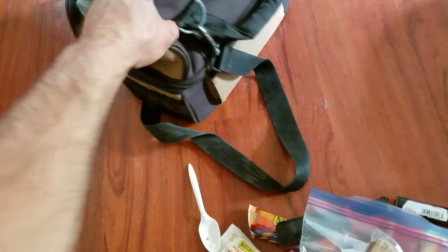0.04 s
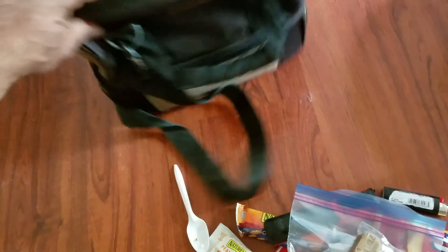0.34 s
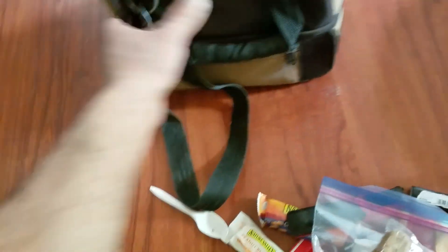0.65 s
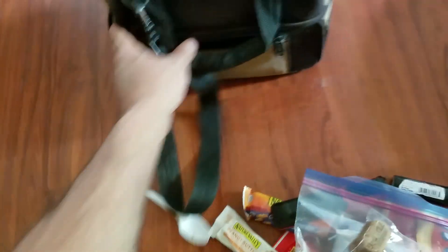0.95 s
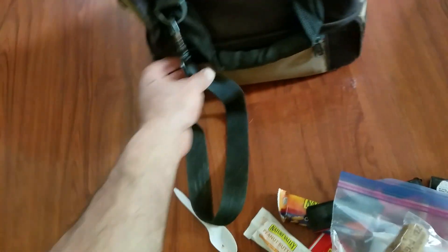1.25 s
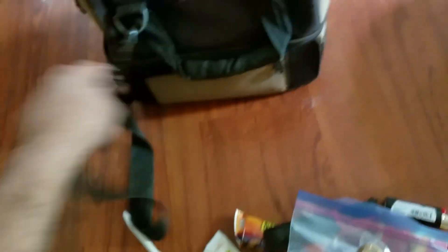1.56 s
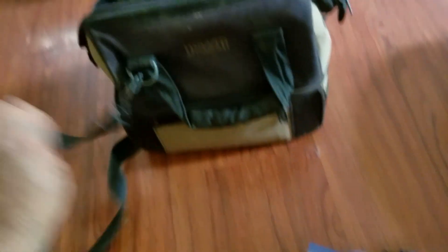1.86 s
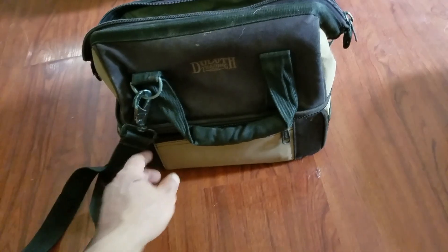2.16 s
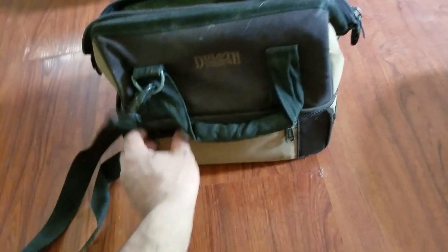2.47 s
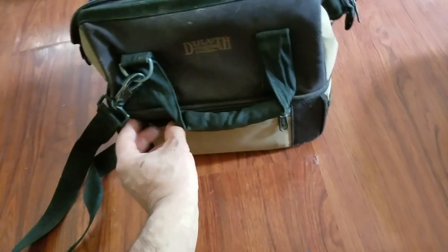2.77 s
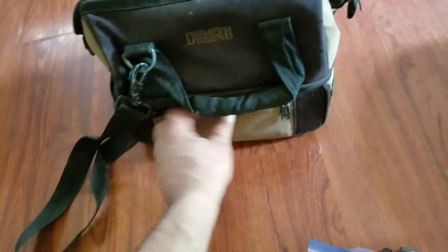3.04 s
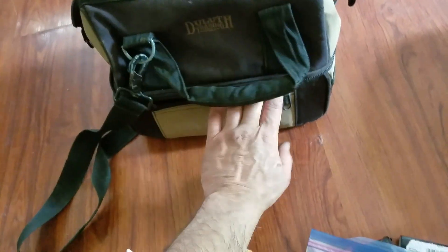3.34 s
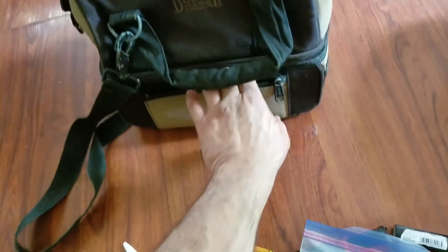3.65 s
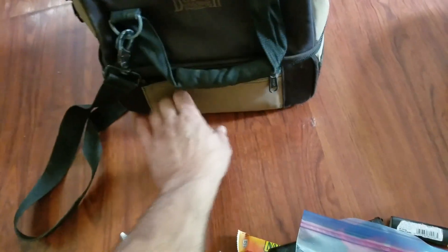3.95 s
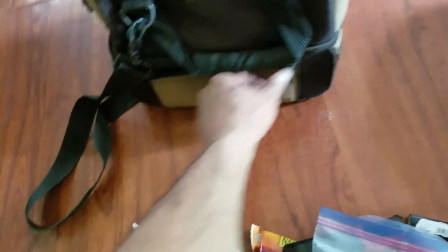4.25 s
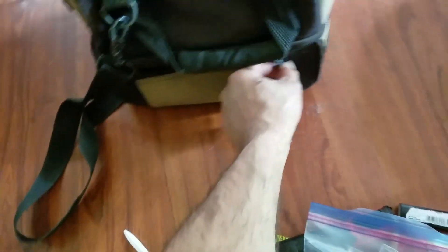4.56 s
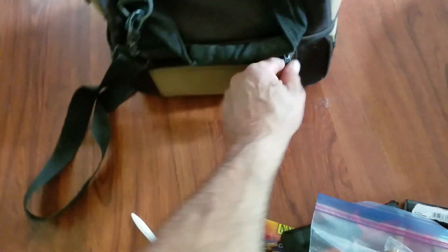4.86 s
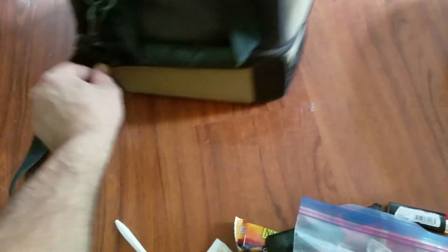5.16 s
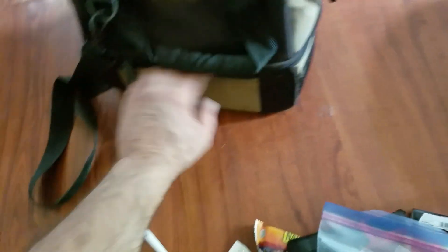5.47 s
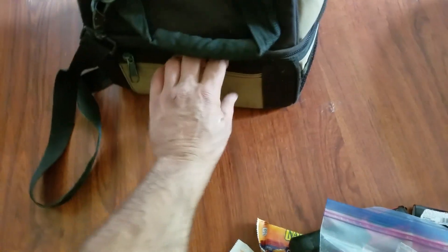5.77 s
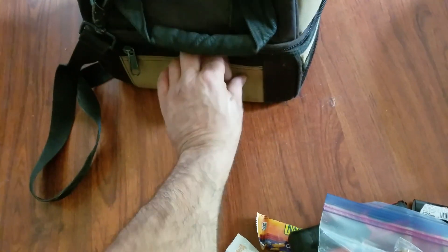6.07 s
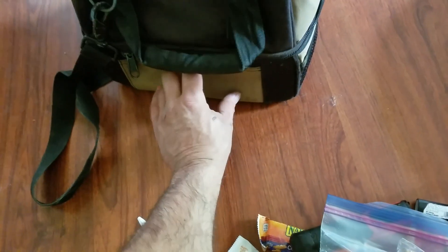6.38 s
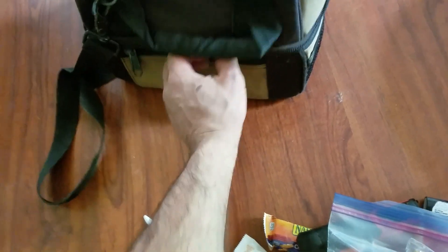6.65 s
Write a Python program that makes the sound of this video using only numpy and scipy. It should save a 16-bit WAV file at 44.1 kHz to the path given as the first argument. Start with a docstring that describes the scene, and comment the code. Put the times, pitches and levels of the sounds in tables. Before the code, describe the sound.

A padded nylon bag rustles and drags on a wooden floor, with small metal clinks and one quick, loud zip.

```python
"""A padded nylon lunch bag is dragged round a wooden floor, close up, and a hand searches its front pocket.
Cloth rasps and hisses in tiny slips, creases snap, and the hollow body thumps. Fingernails pluck ribbed
webbing and the pocket zipper opens in one loud run; both buzz through the stiff panels.
The metal strap clasp and zipper pulls tick and ring. A small, quiet room lies behind."""
import sys
import numpy as np
from scipy import signal
from scipy.fft import rfft, irfft, next_fast_len
from scipy.io import wavfile
from scipy.ndimage import uniform_filter1d, map_coordinates

SR = 44100
rng = np.random.default_rng(int(sys.argv[2]) if len(sys.argv) > 2 else 0)


def put_to_file(sound):
    """Save the sound as 16-bit audio at rate SR, in the file named by the first command-line argument."""
    columns = np.atleast_2d(sound).T  # one column per channel
    safe = np.clip(columns, -1, 1)
    whole_steps = np.round(safe * 32767)
    wavfile.write(sys.argv[1], SR, whole_steps.astype(np.int16))


N = 300321

# Hand effort on the bag. Each row: time in seconds, rubbing level in dB.
EFFORT_DB = [(0.0, -51.5), (0.1, -53), (0.47, -53), (0.63, -53), (1.12, -51.5), (1.26, -65), (1.42, -55),
             (1.6, -57), (1.75, -60.5), (1.96, -54), (2.15, -70.5), (2.43, -66), (2.55, -52), (2.8, -65),
             (2.92, -52.5), (3.3, -52.5), (3.39, -57.5), (3.72, -53.5), (4.14, -54), (4.25, -58),
             (4.33, -55.5), (4.48, -58), (4.98, -65.5), (5.18, -39), (5.45, -54.5), (5.62, -66),
             (6.05, -69), (6.16, -45), (6.3, -60), (6.65, -46), (6.81, -57.5)]
# Drags over the floor. Each row: time of top speed, rise and fall in seconds, hiss in dB.
DRAGS = [(0.439, 0.31, .19, -39), (0.995, .055, 0.063, -47), (1.085, 0.088, .11, -47.5),
         (1.435, 0.047, 0.037, -50.5), (1.58, 0.098, 0.16, -54.5)]
# Noise spectra. Each row: frequency in Hz, relative density in dB.
HOLLOW_BODY_DB = [(25, -26.5), (70, -10.5), (150, -5.5), (200, 1.5), (255, -1.5), (320, 4.5), (400, 3.5),
                  (520, -7), (750, -2), (1500, -78.5)]
CLOTH_RASP_DB = [(120, -24.5), (300, -12), (480, 0), (750, 1), (1050, 1), (1300, -0.5), (1850, 3),
                 (2450, -0.5), (3200, -8), (5000, -16.5), (9000, -35), (16000, -96)]
SLIDE_HISS_DB = [(800, -16), (2200, 11.5), (3500, 5), (4800, 4), (6300, 5), (8000, 1.5), (9600, -3),
                 (11500, 0.5), (14000, -0.5), (16000, -8.5)]
SKIN_HISS_DB = [(1500, -3), (3500, 0.5), (5500, 3), (7500, 0), (9500, -2.5), (11500, 1.5), (14000, 3.5),
                (16000, 0)]
ROOM_AIR_DB = [(15, -61), (25, -10.5), (92, -1.5), (153, -1.5), (175, -4), (293, -10), (531, -26.5),
               (754, -16.5), (2220, -14.5), (3430, -24), (3920, -19), (7110, -36), (16000, -16.5)]
# Loud creases. Each row: start in seconds, level in dB, fold pitch in Hz, crisp edge in relative dB.
CREASE_SNAPS = [(0.107, -27.5, 2170, -30), (0.448, -23.5, 2740, -16), (0.672, -33.5, 406, -5),
                (0.804, -34, 594, 1), (0.875, -29, 1010, -6), (1.069, -23, 530, -17),
                (1.1, -28.5, 464, -12), (1.291, -31.5, 680, -17), (1.366, -29, 880, -35),
                (1.414, -30, 2010, -5), (1.467, -30, 515, -15), (1.523, -36.5, 1890, 0.5),
                (1.573, -29, 550, -10), (1.647, -33, 1380, -11), (1.695, -34, 1400, -13),
                (1.789, -31, 1350, -2.5), (1.941, -28, 717, -34), (2.012, -35, 670, -7),
                (2.066, -38.5, 503, -7), (2.566, -30.5, 1370, -2.5), (2.755, -35, 1230, -5),
                (2.922, -33, 1320, -5), (3.071, -22.5, 400, -33), (3.34, -33.5, 770, -23),
                (3.649, -26.5, 1690, -31.5), (3.804, -20, 1490, -20), (3.816, -15, 770, -37),
                (4.322, -27.5, 700, -31), (4.427, -35, 610, -11), (4.511, -35.5, 435, -5.5),
                (4.744, -36, 545, -5), (4.946, -34.5, 360, -6.5), (5.004, -25.5, 2420, -9),
                (5.017, -25, 733, -6.5), (5.344, -28, 1180, -26), (5.402, -31, 902, -20),
                (5.713, -30.5, 1710, -14.5), (5.799, -38.5, 650, -33), (5.922, -37.5, 590, -28),
                (6.122, -25, 590, -9.5)]
# Fingers and strap bump the bag. Each row: start in seconds, level in dB.
BAG_BUMPS = [(0.804, -47), (1.572, -49), (1.942, -43), (3.07, -37), (3.245, -42), (4.946, -49),
             (6.657, -48)]
# Hand pushes. Each row: peak time and length in seconds, level in dB, taut patch pitch in Hz.
PUSHES = [(0.5, 0.11, -45, 450), (0.998, 0.088, -47.5, 1430), (1.345, 0.03, -47, 414),
          (1.582, 0.038, -50, 556), (1.66, 0.066, -52, 1420), (1.963, 0.04, -54, 330),
          (2.027, 0.058, -48.5, 725), (2.516, 0.078, -46.5, 1420), (2.698, 0.11, -52, 527),
          (2.86, .04, -42.5, 2060), (3.003, 0.058, -52, 1010), (3.086, .03, -60, 2430),
          (3.105, .06, -36.5, 514), (3.232, .16, -40.5, 434), (3.464, 0.061, -45.5, 583),
          (3.678, 0.033, -48, 800), (3.911, .13, -38.5, 730), (4.069, .1, -46.5, 725),
          (4.178, 0.057, -41, 685), (4.203, 0.024, -36.5, 770), (5.112, .14, -28.5, 2170),
          (5.264, 0.11, -50, 1020), (5.511, .11, -41.5, 545), (5.718, 0.025, -49.5, 700),
          (6.012, 0.031, -51.5, 2120), (6.06, .03, -50.5, 1310), (6.144, 0.1, -51, 1750),
          (6.233, 0.075, -44.5, 670), (6.421, 0.21, -50.5, 355), (6.568, 0.063, -36.5, 860),
          (6.667, .08, -34, 338.7)]
# Skin brushing nylon. Each row: peak time and length in seconds, hiss in dB.
SKIN_BRUSHES = [(3.897, 0.19, -47.5), (4.075, 0.11, -53.5), (4.197, 0.033, -51), (4.368, 0.29, -52.5),
                (4.557, 0.045, -52.5), (4.686, 0.31, -55), (5.116, 0.14, -40.5), (5.3, 0.48, -50),
                (6.215, 0.2, -52), (6.374, 0.16, -56), (6.584, 0.092, -42.5)]
# Clasp and pull hits. Each row: start in seconds, level in dB, singing mode in Hz, its T60 in seconds.
METAL_HITS = [(0.51, -29.5, 10400, .03), (0.8034, -38, 11330, 0.077), (0.8777, -44, 6220, 0.039),
              (1.3597, -34, 8050, 0.03), (1.4135, -44, 5000, 0.16), (1.6024, -44, 5450, 0.11),
              (1.7909, -31.5, 7900, 0.033), (2.5232, -31.5, 5550, 0.25), (2.5426, -24, 14800, 0.11),
              (2.5657, -46, 11360, 0.29), (2.7562, -35.5, 7700, 0.041), (2.925, -34.5, 14000, 0.033),
              (3.6485, -41, 8500, .03), (3.81, -26, 10400, 0.1), (4.747, -35.5, 8940, 0.022),
              (4.9467, -36, 8930, 0.016), (5.2541, -20.5, 14070, 0.083), (5.2815, -26, 11500, 0.12),
              (5.3442, -27, 14000, .1), (5.373, -38, 4400, 0.08), (5.4013, -31, 10200, 0.12)]
# Modes of the fittings. Each row: frequency in Hz, relative level in dB.
METAL_MODES = [(4400, 7), (5480, -9), (5900, 8), (7490, -2.5), (8414, 7), (10500, -6), (11400, 20),
               (11990, -74), (13990, 10.5), (14300, -11), (14860, -17)]
# Nail or edge on webbing. Each row: start and length in seconds, level in dB, first and final rib rate in Hz.
RIB_SCRAPES = [(0.6, 0.049, -38, 558, 613), (1.075, 0.22, -41.5, 445, 540),
               (1.165, 0.11, -49.5, 316.4, 305), (3.069, 0.074, -29, 380.3, 537.7),
               (6.648, 0.082, -31, 406.4, 341)]
# Panel and cavity resonances. Each row: frequency and width in Hz, gain in dB.
PANEL_MODES = [(376, 73, 5), (770, 410, 0.5), (1018, 35, 3), (1435, 290, -6.5), (1867, 270, 4.5),
               (2410, 83, -3.5)]
# Zipper run. Each row: time in seconds, tooth rate in Hz, gain from slider drag in dB.
ZIPPER_RUN = [(5.03, 276.6, -3.5), (5.06, 305, -2), (5.09, 380.4, -8), (5.108, 693.5, 0.5),
              (5.118, 810.5, -4), (5.127, 741.4, 1), (5.135, 909, -10), (5.148, 1031, -2),
              (5.16, 905, -5.5), (5.169, 726, 2), (5.18, 508, 0), (5.205, 315, -8)]
# Room decay. Each row: frequency in Hz, T60 in seconds.
ROOM_T60_S = [(150, 0.64), (1000, 0.17), (4000, 0.33), (14000, 0.074)]
# Likeness of the two microphone ports. Each row: frequency in Hz, left-right correlation.
PORT_CORRELATION = [(40, 0.23), (150, 0.83), (300, 0.7), (600, 0.87), (1200, 0.53), (2200, 0.41),
                    (4000, -0.06), (8000, 0), (13000, -0.07)]
# Shading by the microphone housing. Each row: frequency in Hz, left minus right in dB.
PORT_SHADE_DB = [(900, 0), (2300, -1.5), (3400, -6), (4600, 0.5), (5600, -6.5), (10000, -8.5), (12500, -1),
                 (15000, 2.5)]

MID_FOLD_HZ = 783


def amp(db):
    return 10 ** (np.asarray(db) / 20)


def unit_rms(x):
    return x / np.sqrt(np.mean(x ** 2) + 1e-20)


def decay(t, t60_s):
    return amp(-60 * t / t60_s)


def at_hz(points, hz):
    """Table lookup on a log frequency axis."""
    knots_hz, values = np.transpose(points)
    return np.interp(np.log(hz + 1), np.log(knots_hz + 1), values)


def curves(rows):
    """Per-sample curve of each column after the time."""
    times_s, *columns = np.transpose(rows)
    return [np.interp(np.arange(N) / SR, times_s, column) for column in columns]


def wobble(rate_hz):
    """Smooth random curve."""
    knots = rng.standard_normal(int(N * rate_hz / SR) + 4)
    return map_coordinates(knots, [np.arange(N) * rate_hz / SR])


def swell(peak_s, rise_s, fall_s, roundness=2.24):
    """Stroke envelope: peak 1, 12 dB down at rise_s before and fall_s after."""
    t = np.arange(N) / SR - peak_s
    near = (t > -3 * rise_s) & (t < 3 * fall_s)
    distance = np.abs(t[near] / np.where(t[near] < 0, rise_s, fall_s))
    gain = np.zeros(N)
    gain[near] = amp(-12 * distance ** roundness)
    return gain


def filtered(x, response):
    """Apply a complex frequency response."""
    size = 2 * next_fast_len(N // 2 + SR // 4)
    return irfft(rfft(x, size) * response(np.fft.rfftfreq(size, 1 / SR)), size)[..., :N]


def coloured(x, spectrum_db):
    """Minimum-phase filter; keeps the power of white noise."""
    def response(hz):
        cepstrum = irfft(np.log(unit_rms(amp(at_hz(spectrum_db, hz)))))
        half = len(cepstrum) // 2
        return np.exp(rfft(np.r_[cepstrum[0], 2 * cepstrum[1:half], np.zeros(half)]))
    return filtered(x, response)


def noise_band(pitch_hz, width_hz, count):
    """Unit-RMS noise in one resonance."""
    radius = np.exp(-np.pi * width_hz / SR)
    poles = [1, -2 * radius * np.cos(2 * np.pi * pitch_hz / SR), radius ** 2]
    once = signal.lfilter([1, 0, -1], poles, rng.standard_normal(count))
    return unit_rms(signal.lfilter([1, 0, -1], poles, once))


def add(track, start_s, sound):
    start = max(round(start_s * SR), 0)
    part = track[..., start:start + sound.shape[-1]]
    part += sound[..., :part.shape[-1]]


def spread(pair):
    """Two unrelated signals to left and right, alike in the bass."""
    def response(hz):
        angle = np.arccos(np.clip(at_hz(PORT_CORRELATION, hz), -1, 1)) / 2
        return np.array([np.cos(angle), np.sin(angle)])
    mid, side = filtered(pair, response)
    return np.array([mid + side, mid - side])


def friction(slips_per_s, size_db, clump_db, clump_hz):
    """Threads catch and let go: uneven slips, in clumps."""
    slips = rng.random(N) < slips_per_s / SR
    sizes = amp(size_db * np.clip(rng.standard_normal(N), -2, 2))
    clumps = amp(clump_db * wobble(clump_hz))
    return unit_rms(slips * sizes * clumps * rng.standard_normal((2, N)))


def sliding_cloth():
    """Cloth shakes the hollow bag, rasps and hisses with hand effort; drags add rasp and hiss."""
    effort_db, = curves(EFFORT_DB)
    above_usual_db = effort_db + 55
    drag = sum(amp(db) * swell(peak_s, rise_s, fall_s, roundness=1.5)
               for peak_s, rise_s, fall_s, db in DRAGS)
    body_gain = amp(-62 + 0.58 * above_usual_db)
    rasp_gain = np.hypot(amp(effort_db + 0.5), amp(-9.5) * drag)
    hiss_gain = np.hypot(amp(-61.5 + 0.77 * above_usual_db), drag)
    body = body_gain * friction(slips_per_s=2500, size_db=2, clump_db=2.5, clump_hz=60)
    rasp = rasp_gain * friction(slips_per_s=2400, size_db=3.6, clump_db=3, clump_hz=70)
    hiss = hiss_gain * friction(slips_per_s=14000, size_db=2.5, clump_db=1.63, clump_hz=42)
    return coloured(body, HOLLOW_BODY_DB) + coloured(rasp, CLOTH_RASP_DB) + coloured(hiss, SLIDE_HISS_DB)


def crinkles(per_s=9, above_effort_db=10.5, scatter_db=2.5, scatter_octaves=0.83, crisp_db=-32):
    """Small creases give at random, louder with effort. Rows as in CREASE_SNAPS."""
    draws = rng.random((200, 3))
    starts_s = np.cumsum(0.3 + 1.4 * draws[:, 0]) / per_s
    size, pitch = np.sqrt(3) * (2 * draws[:, 1:].T - 1)  # unit variance
    db = np.interp(starts_s, *np.transpose(EFFORT_DB)) + above_effort_db + scatter_db * size
    fold_hz = MID_FOLD_HZ * 2 ** (scatter_octaves * pitch)
    return [(*row, crisp_db) for row in zip(starts_s, db, fold_hz) if row[0] < N / SR]


def snaps_and_bumps(attack_s=0.00076, mid_snap_db=-28.5):
    """A crease cracks and crumples, its fold rings and the bag thumps. A bump only thumps."""
    t = np.arange(SR // 6) / SR
    cloth, thump, crisp = np.zeros((3, 2, N))
    folds = np.zeros(N)
    onset = 1 - np.exp(-(t / attack_s) ** 4)
    crack = onset * decay(t, t60_s=0.011)
    crumple = onset * amp(-12) * decay(t, t60_s=0.12)
    boom = onset * decay(t, t60_s=0.14)
    ring = onset * decay(t, t60_s=0.019)
    for start_s, db in BAG_BUMPS:
        add(thump, start_s, amp(db) * boom * rng.standard_normal((2, len(t))))
    for start_s, db, fold_hz, crisp_db in list(CREASE_SNAPS) + crinkles():
        noise = rng.standard_normal((3, 2, len(t)))
        # big, low folds shake the bag more
        thump_db = -52 + 0.19 * (db - mid_snap_db) - 2.5 * np.log2(fold_hz / MID_FOLD_HZ)
        add(cloth, start_s, amp(db - 5) * (crack + crumple) * noise[0])
        add(thump, start_s, amp(thump_db) * boom * noise[1])
        add(crisp, start_s, amp(db + crisp_db) * (crack + crumple) * noise[2])
        drift_rad = np.cumsum(0.073 * rng.standard_normal(len(t)))  # a slack fold holds no pitch
        add(folds, start_s, amp(db - 1) * ring * np.sin(2 * np.pi * fold_hz * t + drift_rad))
    cracks = coloured(cloth, CLOTH_RASP_DB) + coloured(crisp, SLIDE_HISS_DB)
    return spread(cracks + coloured(thump, HOLLOW_BODY_DB)) + folds


def scuffs(rise_share=0.53, mid_patch_hz=700):
    """A push rasps the cloth, rings a taut patch and hisses under the skin. A brush only hisses."""
    pushes, patches = np.zeros((2, N))
    for peak_s, length_s, db, patch_hz in PUSHES:
        push = amp(db) * swell(peak_s, rise_share * length_s, (1 - rise_share) * length_s)
        pushes += push
        taut = noise_band(patch_hz, width_hz=60 + 0.22 * patch_hz, count=SR)
        active = np.flatnonzero(push)
        patch_db = -5 - np.log2(patch_hz / mid_patch_hz)  # larger, lower patches resonate more
        patches[active] += amp(patch_db) * push[active] * taut[:len(active)]
    brushes = sum(amp(db) * swell(peak_s, length_s / 2, length_s / 2)
                  for peak_s, length_s, db in SKIN_BRUSHES)
    slips = pushes * friction(slips_per_s=6000, size_db=2.5, clump_db=1.8, clump_hz=130)
    cloth = amp(-2) * coloured(slips, CLOTH_RASP_DB) + amp(-13.5) * coloured(slips, HOLLOW_BODY_DB)
    skin_gain = np.hypot(amp(-14.5) * pushes, brushes)
    skin = skin_gain * friction(slips_per_s=22000, size_db=-1, clump_db=3, clump_hz=450)
    return spread(cloth + coloured(skin, SKIN_HISS_DB)) + patches


def clinks(attack_s=0.00049):
    """Metal on metal: a tick, modes that vary with the contact point, one singing until webbing damps it."""
    t = np.arange(SR // 4) / SR
    rings, ticks = np.zeros((2, 2, N))
    modes_hz, modes_db = np.transpose(METAL_MODES)
    onset = 1 - np.exp(-t / attack_s)
    strike = onset * decay(t, t60_s=0.019)
    for start_s, db, sing_hz, t60_s in METAL_HITS:
        hz = np.r_[sing_hz, modes_hz * (1 + 0.025 * rng.standard_normal(len(modes_hz)))]
        gains = amp(np.r_[5, modes_db] + 6.6 * rng.standard_normal((2, len(hz))))
        modes = np.sin(2 * np.pi * (hz[:, None] * t + 0.5 * rng.random((2, len(hz), 1))))
        chord = unit_rms((gains[..., None] * modes).sum(1))
        singing = np.array([noise_band(sing_hz, width_hz=280, count=len(t)) for _ in range(2)])
        tail = onset * decay(t, t60_s)
        add(rings, start_s, (amp(db - 9) * strike + amp(db - 19.5) * tail) * chord)
        add(rings, start_s, amp(db - 10.5) * tail * singing)
        add(ticks, start_s, amp(db - 4.5) * strike * rng.standard_normal((2, len(t))))
    return rings + coloured(ticks, SKIN_HISS_DB)


def panel_response(hz, cutoff_hz=2700):
    """The bag's panels resonate; bending waves bring the lows after the highs."""
    modes = sum(amp(db) * 1j * hz * width_hz / (mode_hz ** 2 - hz ** 2 + 1j * hz * width_hz)
                for mode_hz, width_hz, db in PANEL_MODES)
    dispersion = np.exp(-1j * np.sqrt(hz))
    return modes * dispersion / (1 + (hz / cutoff_hz) ** 8)


def rib_plucks(rib_hz, jitter):
    """One pluck per rib, unevenly paced, rung through the panels at steady level."""
    ribs_passed = np.cumsum(rib_hz * np.exp(jitter * wobble(rate_hz=300))) / SR
    plucks = np.diff(np.floor(ribs_passed), prepend=0) * amp(rng.standard_normal(N))
    rung = filtered(plucks, panel_response)
    power = np.abs(uniform_filter1d(rung ** 2, size=900))
    return rung / np.sqrt(power + 1e-12)


def rib_buzz(rib_hz, pressure, trailing_db, hum_cutoff_hz=800):
    """Two contacts cross ribs or teeth, one trailing. Light pressure hums; hard pressure adds overtones."""
    lead = rib_plucks(rib_hz, jitter=0.028)
    trailing = rib_plucks(rib_hz * 0.69, jitter=0.11)
    buzz = amp(-1.87) * lead + amp(trailing_db) * trailing * np.array([[1], [0.4]])
    hum = amp(3) * filtered(lead, lambda hz: 1 / (1 + (hz / hum_cutoff_hz) ** 6))
    pressure_db = 20 * np.log10(pressure + 1e-9)
    bite = np.clip((pressure_db + 43) / 13, 0, 1)
    return pressure * (bite * buzz + (1 - bite) * hum)


def scrapes(attack_s=0.013, settle_s=0.02, fade_db=21.5):
    """A nail or edge bites into webbing; its speed settles as the pressure fades."""
    t = np.arange(N) / SR
    rib_hz, pressure = np.full(N, float(RIB_SCRAPES[0][3])), np.zeros(N)
    for start_s, length_s, db, first_hz, final_hz in RIB_SCRAPES:
        after = t >= start_s
        age_s = t[after] - start_s
        rib_hz[after] = final_hz + (first_hz - final_hz) * np.exp(-age_s / settle_s)
        drop_db = fade_db * np.minimum(age_s / length_s, 10) ** 1.46
        pressure[after] = np.minimum(age_s / attack_s, 1) * amp(db - drop_db)
    return rib_buzz(rib_hz, pressure, trailing_db=-4)


def zipper(attack_s=0.0045, release_s=0.035, brisk_hz=775, db_per_octave=6):
    """The slider runs over the teeth: pitch and level follow speed, drag adds level."""
    t = np.arange(N) / SR
    teeth_hz, drag_db = curves(ZIPPER_RUN)
    start_s, end_s = ZIPPER_RUN[0][0], ZIPPER_RUN[-1][0]
    moving = np.clip((t - start_s) / attack_s, 0, 1) * np.clip((end_s - t) / release_s, 0, 1)
    level_db = -20.5 + drag_db + db_per_octave * np.log2(teeth_hz / brisk_hz)
    return rib_buzz(teeth_hz, moving * amp(level_db), trailing_db=-10)


def room_reverb(x):
    """Wall reflections, each frequency decaying at its own rate."""
    hz, t, spectra = signal.stft(rng.standard_normal((2, SR // 2)), SR, nperseg=256)
    _, tail = signal.istft(spectra * decay(t, at_hz(ROOM_T60_S, hz)[:, None]), SR, nperseg=256)
    tail /= np.linalg.norm(tail[0])
    tail = np.pad(tail, ((0, 0), (SR // 200, 0)))  # 5 ms predelay
    return signal.fftconvolve(x, tail, axes=1)[:, :N]


def scene():
    """Close bag, room reverb and still air."""
    air = amp(-62.5) * coloured(rng.standard_normal((2, N)), ROOM_AIR_DB)
    bag = spread(sliding_cloth()) + scuffs() + zipper() + scrapes() + clinks() + snaps_and_bumps()
    direct = filtered(bag, lambda hz: amp(np.array([[0.5], [-0.5]]) * at_hz(PORT_SHADE_DB, hz)))
    reverb = amp(-13) * room_reverb(bag)
    return direct + spread(reverb + air)


def record(dry):
    """Steep low-pass band limit."""
    cutoff_hz = 16100
    return filtered(dry, lambda hz: 1 / (1 + (hz / cutoff_hz) ** 120))


dry = scene()
out = record(dry)
put_to_file(out)
```